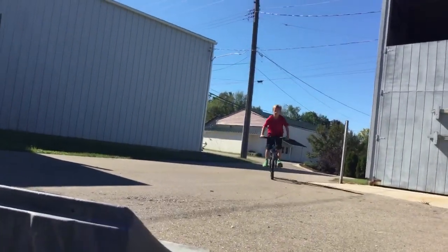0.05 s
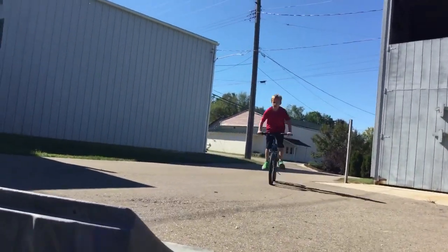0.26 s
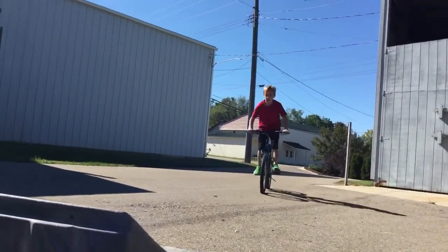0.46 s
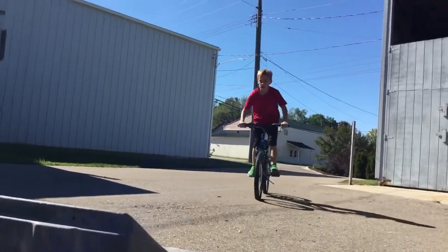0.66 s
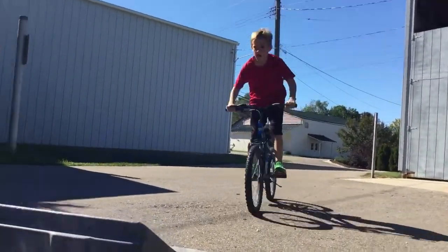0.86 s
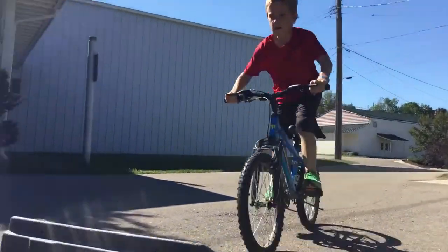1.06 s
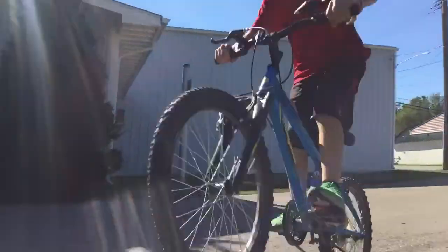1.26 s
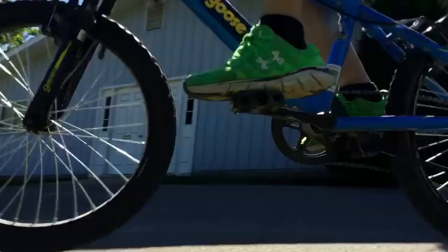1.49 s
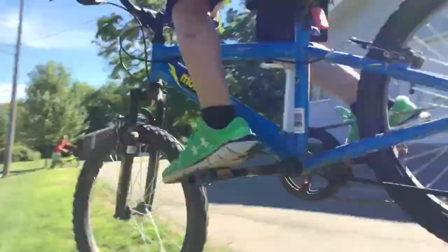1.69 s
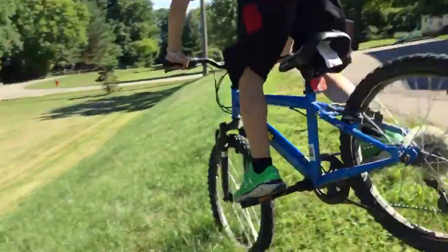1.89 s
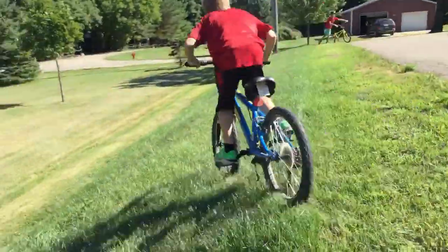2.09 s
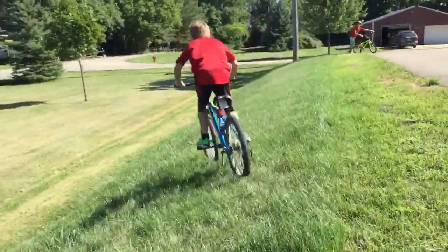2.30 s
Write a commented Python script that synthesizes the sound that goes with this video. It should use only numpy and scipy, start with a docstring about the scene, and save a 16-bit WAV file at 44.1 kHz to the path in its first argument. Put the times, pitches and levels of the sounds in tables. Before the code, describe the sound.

A bicycle coasts nearer on asphalt, its thin, high freewheel ticks faint over insect buzz and soft neighbourhood hum. At 1.2 seconds it strikes a hollow plastic ramp close by with a sharp crack, then booming and clattering until about 1.65. Clear ticks slow in the air from 1.6 to 1.95. It lands with a thump near 2.0 and rattles over grass until about 2.3.

```python
"""Freewheel ticks come first, a thin treble patter over a buzzing insect and the hum of the neighbourhood.
A bicycle coasts down a paved alley and over a hollow plastic ramp close by, which booms under each wheel.
The rear wheel ticks free in the air, slowing, and the bicycle lands rattling on grass.
Ticks, clacks and thuds are short bursts through resonances; tyre knobs drum on the ramp's shell modes.
Tyres and hum are shaped noise, the insect is a gated wavering tone."""
import sys
import numpy as np
from scipy import signal
from scipy.fft import rfft, irfft
from scipy.io import wavfile
from scipy.ndimage import uniform_filter1d

SR = 44100
rng = np.random.default_rng(int(sys.argv[2]) if len(sys.argv) > 2 else 0)


def master(y):
    """Save y as 16-bit WAV."""
    cut = np.clip(np.atleast_2d(y).T, -1, 1)
    pcm = np.round(cut * 32767)  # scale
    wavfile.write(sys.argv[1], SR, pcm.astype(np.int16))


N = 103370
T = np.arange(N) / SR   # s
RAMP_S = 1.19   # front wheel meets the ramp

# Freewheel on the approach: [t/s, ratchet teeth passed]
TEETH_PASSED = [(0.0328, 0), (0.163, 10), (0.5177, 38), (0.7672, 57), (0.8774, 65), (1.0206, 76),
                (1.1418, 86), (1.19, 90)]
# Level of the approaching ticks: [t/s, level/dB of bands below 10 kHz, level/dB of bands above]
APPROACH_LEVEL = [(0, -41, -43), (0.25, -44.5, -62), (.5, -60, -39), (0.7, -43.5, -45), (0.95, -33, -44),
                  (1.19, -38, -36)]
# Treble bands that carry from in front: [f/Hz, first-pass width/Hz, level/dB]
FAR_BANDS = [(7180, 1500, 8), (5730, 400, 6), (11300, 1400, 2.5), (15100, 2400, 4)]
# Freewheel ticks close by, slowing in the air: [t/s, peak level/dB]
NEAR_TICKS = [(1.5845, -20), (1.6042, -26), (1.6228, -22), (1.641, -17), (1.6548, -19), (1.6701, -23.5),
              (1.691, -23), (1.733, -21.5), (1.756, -21), (1.78, -20.5), (1.8059, -21.5), (1.833, -23.5),
              (1.8602, -22), (1.8888, -21), (1.915, -22.5), (1.9404, -21.5)]
# Resonances of hub and spokes: [f/Hz, level/dB before scatter]
HUB_MODES = [(1990, 7.5), (2495, 9), (3640, 8), (5140, -12), (5760, 8.5), (6500, 10.5), (7630, 7),
             (8780, -3), (11700, -4)]
# Wheels on the ramp: [t/s, boom level/dB, panel level/dB, f/Hz favoured by the wheel's position]
RAMP_LOAD = [(1.191, -76, -40, 185), (1.196, -24, -23.5, 284), (1.225, -21.5, -24, 161),
             (1.255, -23, -32, 280), (1.29, -19.5, -45, 203), (1.325, -35, -35.5, 196),
             (1.352, -24.5, -23.5, 275), (1.376, -16, -24, 274), (1.395, -17, -34, 134),
             (1.425, -16.5, -26.5, 194), (1.452, -15, -38, 275), (1.475, -15, -52, 170),
             (1.492, -25.5, -44, 181), (1.54, -31.5, -32, 190), (1.556, -19.5, -27, 256),
             (1.575, -21.5, -40, 169), (1.595, -25, -42, 210), (1.64, -25, -46.5, 210),
             (1.67, -35, -65, 155), (1.7, -39.5, -58, 174), (1.78, -63, -75, 172)]
# Modes of the hollow ramp shell: [f/Hz, level/dB]
SHELL_MODES = [(110, -1), (138, 2.5), (177, 0), (215, -5), (247, -4), (300, -2), (350, -3), (455, 7),
               (560, 2.5), (630, 6.5), (705, 8), (800, -0.5), (1010, -2.5), (1200, -4)]
# Clacks of chain, stand and ramp edge: [t/s, peak level/dB, ring f/Hz, burst t60/s, ring width/Hz]
CLACK_EVENTS = [(1.1926, -15, 2020, 0.014, 600), (1.2042, -4, 5840, 0.018, 2500),
                (1.2477, -22.5, 3450, 0.034, 200), (1.262, -25.5, 9900, 0.0037, 4000),
                (1.3635, -11.5, 8600, 0.016, 5000), (1.369, -14, 4260, 0.052, 3100),
                (1.3746, -17, 11700, 0.012, 4000), (1.391, -13.5, 6260, 0.013, 413),
                (1.42, -16.5, 3670, 0.0051, 1500), (1.4269, -18, 5700, 0.026, 3020),
                (1.484, -17, 5100, 0.01, 2240), (1.6424, -20, 6360, 0.0081, 1510),
                (1.7122, -13.5, 3840, 0.029, 3270), (1.9621, -20.5, 2700, 0.067, 2040),
                (1.986, -8.5, 1180, 0.15, 1010), (1.9918, -10.5, 2030, 0.05, 334),
                (2.0506, -10.5, 4550, 0.04, 2530), (2.08, -18, 2640, 0.041, 2000),
                (2.1168, -18.5, 7860, 0.062, 3300), (2.118, -26.5, 1470, 0.11, 402),
                (2.194, -20.5, 3750, 0.069, 3620), (2.213, -21.5, 3530, 0.013, 2000),
                (2.223, -23, 2960, 0.015, 3500), (2.2511, -15.5, 5670, 0.025, 3820),
                (2.2578, -15, 3500, 0.014, 1500), (2.279, -26, 3940, 0.014, 2000),
                (2.3097, -22, 7200, 0.051, 3020)]
# Hard single snaps of ramp edge and frame: [t/s, peak level/dB, f/Hz]
SNAP_EVENTS = [(1.2030, -7, 3600), (1.2049, -1, 6500), (1.2058, -1, 6200), (1.2077, -9, 7000),
               (1.3509, -20, 6000), (1.5495, -22, 2200), (1.7132, -13, 4500), (1.3914, -12, 4000),
               (1.9931, -9, 1800), (2.2575, -15, 3500)]
# Tyres thudding on turf, woody knocks of ramp and frame: [t/s, peak level/dB, f/Hz, nominal decay/s]
THUD_EVENTS = [(1.353, -13, 653, 0.047), (1.367, -16.5, 730, 0.074), (1.5485, -15, 783, 0.11),
               (1.967, -34, 141, 0.06), (1.991, -10.5, 243, 0.061), (1.992, -22, 690, 0.046),
               (2.032, -20.5, 214, 0.15), (2.035, -18.5, 1180, 0.06), (2.202, -33, 600, 0.078),
               (2.263, -26, 1100, 0.036), (2.295, -33.5, 163, 0.068)]
# Tyres on asphalt, plastic, then grass: [t/s, level/dB, gain above 4 kHz/dB]
TYRE_LEVEL = [(0, -53, -7.5), (0.6, -50.5, -6), (0.95, -47, -3), (1.19, -43, 0.5), (1.197, -25, -23),
              (1.24, -35, -1.5), (1.33, -32, -12), (1.37, -22, -5.5), (1.44, -32, -8), (1.55, -44, 9),
              (1.65, -46.5, 0), (1.955, -49.5, 2), (1.968, -33.5, -2), (1.996, -12, -3), (2.015, -36, -1.5),
              (2.04, -33, 9), (2.09, -32, 0), (2.13, -38.5, 7), (2.17, -46.5, 8.5), (2.2, -40.5, 4),
              (2.34, -44, 8)]
# Tone of the rolling tyres: [f/Hz, level/dB per Hz]
TYRE_SPECTRUM = [(300, -1), (700, -3), (1400, 2), (2200, 0), (3600, -3), (7000, -9), (16000, -18)]
# Narrow sizzle of the nearing bicycle: [t/s, level/dB]
SIZZLE_LEVEL = [(0.45, -81), (0.75, -64.5), (1.15, -56), (1.25, -74)]
# Tone of the neighbourhood hum: [f/Hz, level/dB per Hz]
HUM_SPECTRUM = [(30, -68), (98, -5.5), (227, 0.5), (374, -10), (550, -9.5), (1040, -10), (2500, -17),
                (4600, -42), (7000, -20.5), (9500, -39), (16000, -74)]

FAR_T60_S, FAR_SCATTER_DB, FAR_MODE_SCATTER_DB = 0.012, 1.5, 1.8
TICK_T60_S, TICK_SCATTER_DB, TICK_HISS_DB, HUB_Q = 0.027, 4.5, -3, 9.0
SPIKE = 2.14   # first contact, against the noise that follows
KNOBS_PER_S, KNOB_SPREAD_DB, FAVOUR_DB_PER_OCTAVE = 450, 3.5, 12
PANEL_FROM_HZ = 400   # modes below it boom, those above are the panels
BOOM_WIDTH_HZ, PANEL_WIDTH_HZ = 0.99 / 0.054, 3.24 / 0.046
CRACK_DB, CRACK_DB_PER_OCTAVE = -7.5, 4   # level at 1 kHz ring width, rising with width
CRACK_T60_S = 0.011   # extra decay for a 2 kHz ring, much longer in brighter clacks
SNAP_Q = 1.5
GRIT_PER_S, GRIT_SPREAD_DB, GRIT_T60_S = 500, 4, 0.013
HISS_SHARE, ASPHALT_GRIT = 0.91, 0.69   # steady hiss; grit share before the ramp
PATCHY_DB = 3.0
SIZZLE_HZ, SIZZLE_WIDTH_HZ = 5380, 410
INSECT_HZ, INSECT_WAVER_HZ = 7880, 129   # centre, rms waver
INSECT_PULSES_HZ, INSECT_DUTY, INSECT_LEAK, INSECT_START_S = 48.15, 0.59, 0.27, 0.0142
INSECT_DB, INSECT_SWELL_DB_PER_S, INSECT_DROP_DB = -58, 4.5, -5   # starting gain ahead of the gate
HUM_DB, DRONE_DB, DRONE_HZ, DRONE_WIDTH_HZ = -52, -57, 190, 36
MIC_LOW_HZ, MIC_STOP_HZ = 100, 15900 * 1.05   # bass corner, start of the 60 dB stop band


def amp(db):
    """dB to gain."""
    return 10 ** (np.asarray(db) / 20)


def unit(x):
    """Scale to rms 1."""
    return x / np.sqrt(np.mean(x ** 2) + 1e-20)


def peak_unit(x):
    """Scale to peak 1."""
    return x / np.abs(x).max()


def in_time(rows):
    """Draw each column of a table as a curve over the whole scene."""
    s, *columns = np.transpose(rows)
    return [np.interp(T, s, c) for c in columns]


def resonate(x, hz, width_hz):
    """Two-pole resonance with gain about 1 on top."""
    r = np.exp(-np.pi * width_hz / SR)
    feedback = [1, -2 * r * np.cos(2 * np.pi * hz / SR), r * r]
    return signal.lfilter(np.array([1, 0, -1]) * (1 - r * r) / 2, feedback, x)


def colour(x, spectrum):
    """Shape a signal by a spectrum table, at rms 1."""
    hz, db = np.transpose(spectrum)
    f = np.maximum(np.arange(N // 2 + 1) * SR / N, 1)
    gain = amp(np.interp(np.log(f), np.log(hz), db))
    return unit(irfft(rfft(x) * gain, N))


def grains(rate, spread_db):
    """Random clicks of uneven size and either sign."""
    hits = rng.random(N) < rate / SR
    sizes = amp(spread_db * np.minimum(rng.exponential(1, N), 4))
    return hits * sizes * rng.choice([-1, 1], N)


def add(out, s, x):
    """Mix x into out from time s."""
    i = int(s * SR)
    out[i:i + len(x)] += x[:max(len(out) - i, 0)]


def burst(t60):
    """A sharp first contact, with noise that rises fast and dies away."""
    t = np.arange(4000) / SR
    x = rng.standard_normal(4000) * amp(-60 * t / t60) * np.minimum(t / 0.00068, 1)
    x[12] += SPIKE
    return x


def tick(t60, scatter_db):
    """One snap of the pawl through the hub's resonances, with new strengths; peak 1."""
    snap = burst(t60)
    strengths = rng.normal(0, scatter_db, len(HUB_MODES))
    body = sum(amp(db + k) * unit(resonate(snap, hz, hz / HUB_Q))
               for (hz, db), k in zip(HUB_MODES, strengths))
    hiss = unit(np.diff(snap, prepend=0))
    return peak_unit(unit(body) + amp(TICK_HISS_DB) * hiss)


def freewheel():
    """One tick a tooth on the approach, where only some treble bands carry; full ticks close by."""
    s, teeth = np.transpose(TEETH_PASSED)
    far, out = np.zeros(N), np.zeros(N)
    for at in np.interp(np.arange(91), teeth, s):
        add(far, at, amp(rng.normal(0, FAR_SCATTER_DB)) * tick(FAR_T60_S, FAR_MODE_SCATTER_DB))
    for at, peak_db in NEAR_TICKS:
        add(out, at, amp(peak_db) * tick(TICK_T60_S, TICK_SCATTER_DB))
    treble_db, top_db = in_time(APPROACH_LEVEL)
    for hz, width_hz, db in FAR_BANDS:
        band = resonate(resonate(far, hz, width_hz), hz, width_hz * 2)
        out += amp(db + (top_db if hz > 1e4 else treble_db)) * band
    return out


def ramp():
    """Tyre knobs drum on the hollow shell; the wheel's place picks which deep modes sound."""
    boom_db, panel_db, favoured = in_time(RAMP_LOAD)
    knobs = grains(KNOBS_PER_S, KNOB_SPREAD_DB)
    boom, panel = np.zeros(N), np.zeros(N)
    for k, (hz, db) in enumerate(SHELL_MODES):
        sign = (-1) ** k   # neighbouring modes move oppositely
        if hz < PANEL_FROM_HZ:
            away_db = FAVOUR_DB_PER_OCTAVE * abs(np.log2(hz / favoured))
            boom += sign * amp(db - away_db) * unit(resonate(knobs, hz, BOOM_WIDTH_HZ))
        else:
            panel += sign * amp(db) * unit(resonate(knobs, hz, PANEL_WIDTH_HZ))

    def even(x):
        """Level out the loudness over 25 ms, so the table sets it."""
        return x / np.sqrt(uniform_filter1d(x ** 2, size=1100) + 1e-9)

    loaded = (T > RAMP_LOAD[0][0]) * (T < RAMP_LOAD[-1][0])
    return loaded * (amp(boom_db) * even(boom) + amp(panel_db) * even(panel))


def clacks():
    """Each clack is a dying burst through its ring, plus a broad crack."""
    out = np.zeros(N)
    for s, db, hz, t60, width_hz in CLACK_EVENTS:
        snap = burst(t60)
        ring = unit(resonate(resonate(snap, hz, width_hz), hz, width_hz))
        crack_t60 = CRACK_T60_S * (hz / 2000) ** 2
        dying = snap * amp(-60 * T[:len(snap)] / crack_t60)
        crack = unit(signal.lfilter([1, 0, -1], [1, -.6], dying))
        crack_db = CRACK_DB + CRACK_DB_PER_OCTAVE * np.log2(width_hz / 1000)
        add(out, s, amp(db) * peak_unit(ring + amp(crack_db) * crack))
    return out


def snaps():
    """A single click through a broad ring."""
    out = np.zeros(N)
    for s, db, hz in SNAP_EVENTS:
        click = signal.unit_impulse(400)
        ring = resonate(resonate(click, hz, hz / SNAP_Q), hz, hz * 2)
        add(out, s, amp(db) * peak_unit(ring))
    return out


def thuds():
    """Dull low pushes, each a click and a puff of noise through a damped resonance."""
    out = np.zeros(N)
    for s, db, hz, t60 in THUD_EVENTS:
        puff = 0.077 * burst(t60)
        puff[0] = 1   # the push
        body = resonate(puff, hz, 1.6 / t60 + hz * 0.089)
        add(out, s, amp(db) * peak_unit(resonate(body, hz, hz * 4.7)))
    return out


def tyres():
    """Grains of grit crunch under the tread over a steady hiss; the top end changes with the surface."""
    db, bright_db = in_time(TYRE_LEVEL)
    decay = amp(-60 / (GRIT_T60_S * SR))
    crunch = unit(signal.lfilter([1], [1, -decay], abs(grains(GRIT_PER_S, GRIT_SPREAD_DB))))
    envelope = crunch * np.where(T < RAMP_S, ASPHALT_GRIT, 1) + HISS_SHARE
    grit = colour(envelope * rng.standard_normal(N), TYRE_SPECTRUM)
    top = grit - signal.sosfiltfilt(signal.butter(2, 4000, fs=SR, output="sos"), grit)
    return amp(db) * (grit + (amp(bright_db) - 1) * top)


def sizzle():
    """A narrow band of hiss from the approaching bicycle."""
    band = resonate(rng.standard_normal(N), SIZZLE_HZ, SIZZLE_WIDTH_HZ)
    band = resonate(band, SIZZLE_HZ, SIZZLE_WIDTH_HZ)
    return amp(*in_time(SIZZLE_LEVEL)) * unit(band)


def insect():
    """A wavering tone gated at a steady rate, swelling until the ramp and then quieter."""
    waver = unit(uniform_filter1d(rng.standard_normal(N), size=60))
    whine = np.sin(2 * np.pi * np.cumsum(INSECT_HZ + INSECT_WAVER_HZ * waver) / SR)
    pulse_phase = (T - INSECT_START_S) * INSECT_PULSES_HZ % 1
    gate = uniform_filter1d((pulse_phase < INSECT_DUTY) + INSECT_LEAK, size=120)
    swell_db = INSECT_SWELL_DB_PER_S * np.minimum(T, RAMP_S)
    return amp(INSECT_DB + swell_db + INSECT_DROP_DB * (T > RAMP_S)) * whine * gate


def hum():
    """Neighbourhood hum: noise shaped to a distant, mostly low spectrum."""
    return amp(HUM_DB) * colour(rng.standard_normal(N), HUM_SPECTRUM)


def drone():
    """A low drone within the hum: noise through one narrow resonance."""
    return amp(DRONE_DB) * unit(resonate(rng.standard_normal(N), DRONE_HZ, DRONE_WIDTH_HZ))


def patchy(x):
    """Each narrow treble band swells and dips slowly by itself."""
    spectrum, f, out = rfft(x), np.arange(N // 2 + 1) * SR / N, x.copy()
    for low in 2500 * 2 ** np.arange(0, 2.75, .125):   # eighths of an octave
        band = irfft(spectrum * (f >= low) * (f < low * 2 ** .125), N)
        slow = np.interp(T, np.linspace(0, T[-1], 14), rng.standard_normal(14))
        out += (amp(PATCHY_DB * slow) - 1) * band
    return out


def scene():
    """Bicycle and ramp over the background."""
    bicycle = freewheel() + ramp() + clacks() + snaps() + thuds() + sizzle()
    noise_bed = patchy(tyres() + hum())
    return (bicycle + noise_bed + insect() + drone())[None]


def record(dry):
    """Small microphone: bass cut, rounded peaks, steep top cut."""
    x = signal.sosfilt(signal.butter(4, MIC_LOW_HZ, "high", fs=SR, output="sos"), dry)
    return signal.sosfilt(signal.cheby2(16, 60, MIC_STOP_HZ, fs=SR, output="sos"), np.tanh(x))


dry = scene()
out = record(dry)
master(out)
```